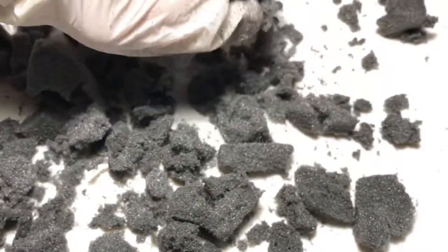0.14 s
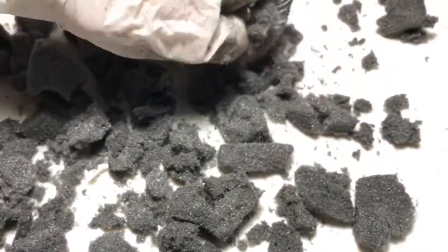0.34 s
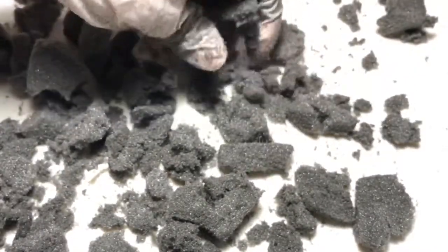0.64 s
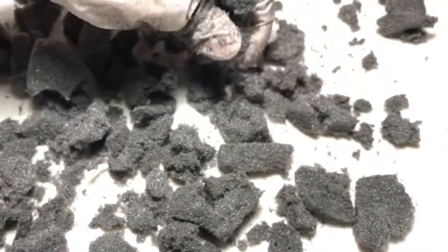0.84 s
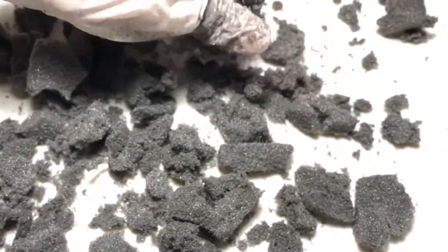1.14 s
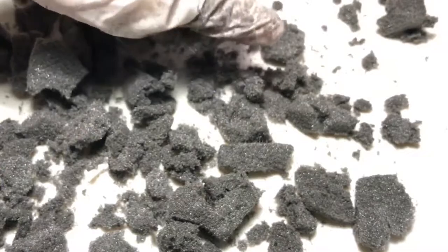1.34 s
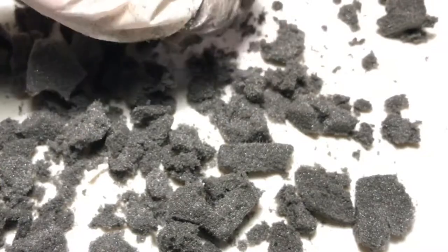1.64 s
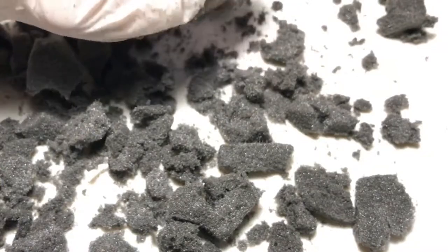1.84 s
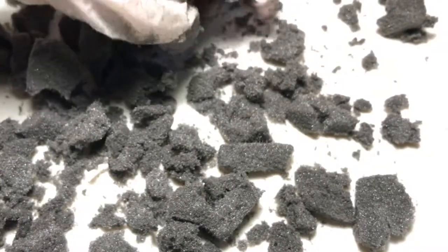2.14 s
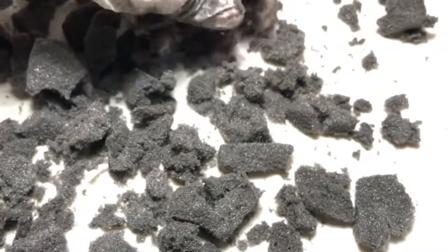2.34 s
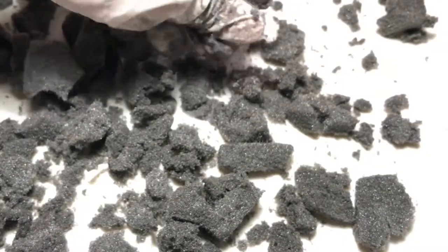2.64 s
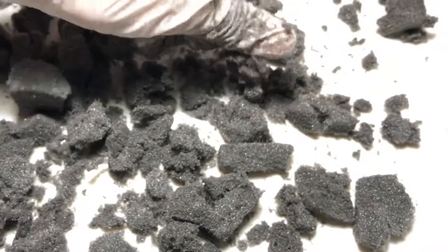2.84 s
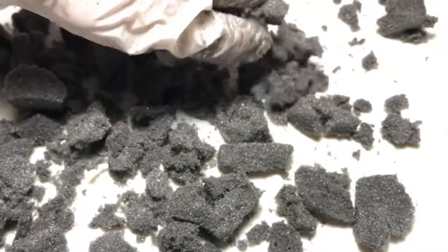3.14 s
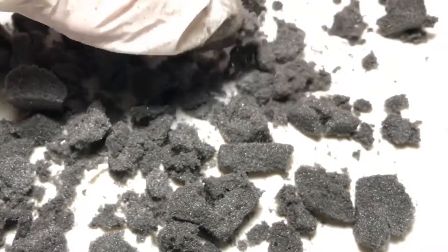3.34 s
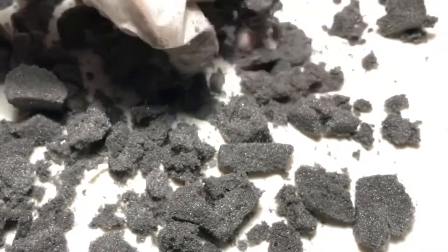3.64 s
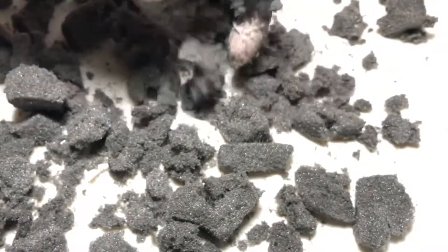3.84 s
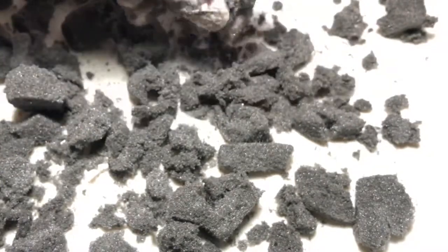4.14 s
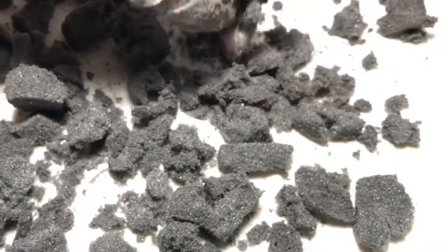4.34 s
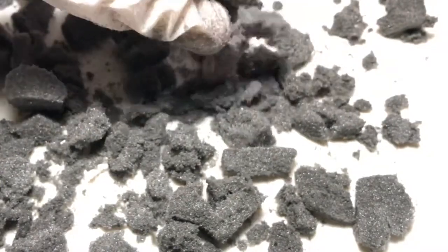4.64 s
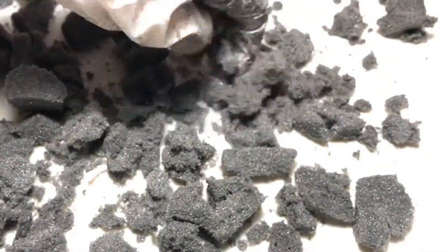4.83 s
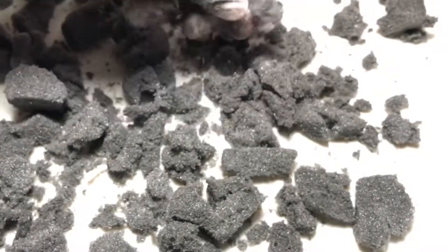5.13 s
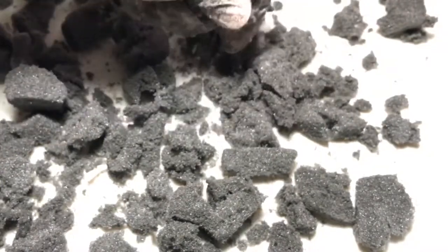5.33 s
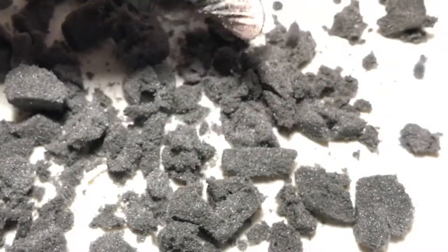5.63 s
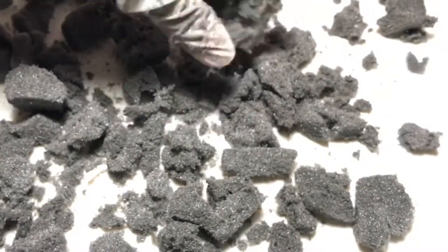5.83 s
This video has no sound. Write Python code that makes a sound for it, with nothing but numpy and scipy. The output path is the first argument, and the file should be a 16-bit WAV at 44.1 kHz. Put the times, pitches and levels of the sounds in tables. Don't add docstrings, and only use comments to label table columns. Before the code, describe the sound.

Dry foam breaks under a gloved hand in quick bursts of fine, fizzy crackle mixed with duller grinding and small lumps ticking on the table. The strongest breaks come in the first second or so; later presses are weaker with brief gaps, apart from one sharp crunch past the middle. Close, dry indoor sound, with faint glove rub and quiet motors droning behind.

```python
import sys
import numpy as np
from scipy import signal
from scipy.fft import rfft, irfft
from scipy.io import wavfile
from scipy.ndimage import uniform_filter1d, map_coordinates

SR = 44100
rng = np.random.default_rng(int(sys.argv[2]) if len(sys.argv) > 2 else 0)


def put_to_file(sound):
    columns = np.atleast_2d(sound).T
    safe = np.clip(columns, -1, 1)
    whole_steps = np.round(safe * 32767)
    wavfile.write(sys.argv[1], SR, whole_steps.astype(np.int16))


def volts_from_decibels(level):
    exponent = np.asarray(level, float) / 20
    return 10 ** exponent


N = 263718
TIME = np.arange(N) / SR
ONSET_S = 0.0011


def unit(x):
    return x / np.sqrt(np.mean(x ** 2))


def colour(x, points):
    hz, db = np.transpose(points)
    bins = np.maximum(np.fft.rfftfreq(len(x), 1 / SR), 1)
    gain = volts_from_decibels(np.interp(np.log(bins), np.log(hz), db))
    return irfft(rfft(x) * gain, len(x))


def walk(rate):
    hold = int(SR / rate)
    steps = np.repeat(rng.standard_normal(N // hold + 1), hold)
    return 0.87 * uniform_filter1d(uniform_filter1d(steps, hold), hold)[:N]


def fractures(rate, spread_db, tail_ms):
    chance, rarity = rng.random((2, N))
    power = (chance < rate / SR) * volts_from_decibels(-spread_db * np.log(1.008 - rarity)) ** 2
    keep = np.exp(-1000 / (tail_ms * SR))
    return np.sqrt(signal.lfilter([1], [1, -keep], power) + 1e-9)


def add(out, s, db, hz, width, tail_ms, noise):
    ms = np.arange(len(noise)) * 1000 / SR
    edges = np.clip([hz - width / 2, hz + width / 2], 300, 15500)
    front = np.exp(-ms / (0.3 * tail_ms))
    splinters = 0.25 * np.exp(-ms / tail_ms)
    burst = signal.lfilter(*signal.butter(2, edges, "band", fs=SR), noise * (front + splinters))
    i = int(s * SR)
    out[i:i + len(ms)] += (burst * volts_from_decibels(db) / np.abs(burst).max())[:N - i]


def air():
    # frequency in Hz, level in dB.
    room_colour = [(15, 3), (45, 6.5), (75, 0.5), (120, -5), (170, -1), (210, -1), (340, -6.5),
                   (500, -13.5), (820, -7.5), (1250, -15.5), (1700, -23.5), (3000, -24), (8000, -23),
                   (16000, -22)]
    # frequency in Hz, width in Hz, level in dB.
    duct_modes = [(346, 12.4, 1.5), (402, 15.6, 2.5), (551.2, 7.1, 0), (613, 14, -5), (706, 18, 0),
                  (809, 30, 0.5), (852, 21, 0), (1112, 14, -0.5), (1213, 40, -4)]
    noise = rng.standard_normal(N)
    duct = np.zeros(N)
    for hz, width, db in duct_modes:
        duct += volts_from_decibels(db) * signal.lfilter(*signal.iirpeak(hz, hz / width, SR), noise)
    room = unit(colour(rng.standard_normal(N), room_colour))
    return room * volts_from_decibels(-51.5 + 0.5 * walk(2.83)) + unit(duct) * volts_from_decibels(-58.5)


def hum():
    shaft_hz, pull_hz, beat_rad = 46.085, 100.08, -2.5
    # shaft order, order of the magnetic pull, level in dB rms.
    lines = [(1, 0, -54), (2, 0, -54), (3, 0, -45.7), (4, 0, -57), (5, 0, -66), (6, 0, -58), (8, 0, -78),
             (9, 0, -78), (12, 0, -78), (15, 0, -79), (0, 1, -64), (2, 1, -59), (3, 1, -67), (4, 1, -62),
             (6, 1, -79), (10, 1, -81), (15, 1, -75), (6, -1, -62), (7, -1, -71), (0, 2, -72), (7, 0, -79),
             (10, 0, -82), (8, 1, -80), (20, 0, -79), (0, 3, -78), (0, 4, -78)]
    # frequency in Hz, level in dB rms.
    motors = [(20.55, -67), (21.11, -68), (40.09, -60), (46.82, -58), (103.85, -70), (139.05, -75),
              (161.64, -70), (207.7, -77), (769.5, -80)]
    out = np.zeros(N)
    for hz, db in motors:
        out -= volts_from_decibels(db) * np.cos(2 * np.pi * hz * TIME)
    for shaft, mains, db in lines:
        start = -2.7 if shaft % 2 else -0.6 + mains * beat_rad
        hz = shaft * shaft_hz + mains * pull_hz
        out += volts_from_decibels(db) * np.cos(2 * np.pi * hz * TIME + start)
    return np.sqrt(2) * out


def squeaks():
    # centre in seconds, pitch in Hz, peak in dB, length in seconds.
    squeak_list = [
        (4.155, 1660, -57, .012),
        (4.28, 1700, -62, .01),
        (4.285, 2050, -61, .01),
        (3.03, 2550, -57, .012),
    ]
    waver = np.cumsum(walk(150)) * 120 / SR
    out = np.zeros(N)
    for s, hz, db, length in squeak_list:
        swell = np.exp(-((TIME - s) / length) ** 2)
        out += volts_from_decibels(db) * swell * np.sin(2 * np.pi * (hz * TIME + waver))
    return out


def lumps():
    # start in seconds, peak in dB, centre in Hz.
    lump_list = [(0.3222, -34, 2430), (0.3666, -47, 3980), (0.414, -41, 2620), (0.5007, -30, 4100),
                 (0.7302, -41.5, 4570), (0.805, -33, 2510), (0.8335, -37, 4310), (1.0675, -35, 4720),
                 (1.1563, -47, 4390), (1.821, -26, 4190), (2.0198, -37, 2450), (2.2306, -31.5, 4600),
                 (2.4149, -37, 4860), (2.4823, -31.5, 4300), (2.5356, -33, 4450), (2.605, -34, 4410),
                 (2.8654, -28.5, 4800), (3.2321, -29, 4560), (3.739, -33, 4260), (4.007, -37, 4800),
                 (4.139, -38.5, 4020), (4.2832, -39, 4150), (4.5206, -37, 4570), (4.5457, -20.5, 5100),
                 (4.598, -40, 4450), (4.6759, -38, 4600), (5.2749, -32, 4500), (5.4301, -30, 4410),
                 (5.5243, -34, 3190), (5.6171, -43, 2770)]
    out = np.zeros(N)
    for s, db, hz in lump_list:
        add(out, s + ONSET_S, db - 2, hz, 1800, 4, rng.standard_normal(500))
    return out


def tears():
    # start in seconds, centre in Hz, width in Hz, peak in dB, tail in ms.
    tear_list = [(.8635, 12700, 6000, -15, 5), (1.027, 12500, 6500, -13, 8.3),
                 (1.048, 12200, 5970, -12.5, 3.5), (2.545, 12700, 6000, -24, 3),
                 (3.02, 2620, 910, -46.5, 25), (3.244, 1500, 1600, -36.5, 35),
                 (3.2445, 4968, 1481, -31.5, 28), (6.3, 4800, 1800, -35, 11), (3.747, 10000, 9000, -36, 5),
                 (4.5405, 12530, 6200, -13, 14), (4.5448, 2770, 880, -28, 7.5),
                 (4.546, 14000, 6000, -12, 6.4), (4.5465, 5700, 1700, -24, 4.5),
                 (4.553, 13000, 5700, -28, 4.4), (4.6125, 11500, 7000, -30, 3), (5.03, 2900, 797, -46, 25),
                 (5.545, 3820, 2600, -33, 19), (5.884, 11000, 8000, -33.5, 4)]
    out = np.zeros(N)
    for s, hz, width, db, tail_ms in tear_list:
        add(out, s, db, hz, width, tail_ms, rng.standard_normal(900))
    return out


def snaps():
    # start in seconds, peak in dB, pitch in Hz (band centre is halfway to 12300).
    snap_list = [(0.5457, -22, 13300), (0.7741, -18, 14500), (0.8066, -7, 13700), (0.843, -12, 9540),
                 (0.856, -8, 14200), (0.8899, -10, 11000), (0.9981, -15, 11300), (1.0256, -9, 14200),
                 (1.044, -13, 11500), (1.1214, -16, 11600), (1.1573, -19, 14300), (1.3892, -24, 12200),
                 (2.2238, -25, 11900), (2.5334, -20, 14000), (3.034, -26, 13600), (3.1163, -22, 13600),
                 (3.2066, -19, 13600), (3.2715, -21, 9190), (3.4196, -31, 11400), (3.6566, -31, 12200),
                 (3.7025, -32, 11600), (3.9025, -29, 13800), (4.0078, -28, 13800), (4.4074, -23, 13800),
                 (4.4574, -19, 13700), (4.5296, -11, 11200), (4.5994, -22, 13000), (4.6768, -25, 14100),
                 (5.8172, -34, 14000), (5.883, -34, 11900)]
    out = np.zeros(N)
    for s, db, hz in snap_list:
        snap, underside, neighbours = rng.standard_normal((3, 900))
        underside_db = -20 - 0.29 * (db + 18)
        add(out, s + ONSET_S, db - 0.5, (hz + 12300) / 2, 5500, 2.2, snap)
        add(out, s + 2 * ONSET_S, db - 22, 11500, 7500, 16, neighbours)
        add(out, s + ONSET_S, db + underside_db - 1, 4200, 4000, 2.5, underside)
    return out


def crack():
    crack_s = 0.2850
    # frequency in Hz, peak in dB, swell in ms, sign of the first push.
    rings = [
        (9350, -4.5, .2, 1),
        (11450, -4.5, .19, -1),
        (7400, -21, .25, 1),
        (13000, -17, .17, 1),
        (5000, -28, .17, 1),
        (4000, -30, .17, -1),
        (2350, -24, .22, 1),
        (1700, -27, .22, -1),
        (980, -28, .29, 1),
        (14600, -24, .15, -1),
    ]
    ms = np.clip(TIME - crack_s, 0, 0.02) * 1000
    out = np.zeros(N)
    for hz, db, swell_ms, sign in rings:
        shape = (ms / swell_ms / 3) ** 3 * np.exp(3 - ms / swell_ms)
        out += sign * volts_from_decibels(db) * shape * np.cos(2 * np.pi * hz * (ms - 0.55) / 1000)
    first, splinters, dull = rng.standard_normal((3, 900))
    add(out, crack_s - 0.0004, -21, 10500, 6000, 1.5, first)
    add(out, crack_s + 0.0016, -18, 10600, 4500, 7, splinters)
    add(out, crack_s + 0.0018, -38, 2200, 1400, 10, dull)
    return out


def hand():
    grip_db_per_s, let_go_db_per_s, rest_db = 258, 263, -58.5
    # start in seconds, length in seconds, crackle at the start in dB,
    # swell over the press in dB, dullness in dB.
    presses = [(0, 0.12, -48, -1, 3.5), (0.296, 0.18, -44, -14.5, 1.5), (0.51, 0.29, -47, 8.5, 0.5),
               (0.846, 0.38, -28.5, -14.5, -2), (1.361, 0.35, -44, -11, 0), (1.681, 0.17, -37.5, -1, 1.5),
               (1.992, 0.038, -44, 1.5, -3), (2.221, 0.53, -45, 5, -1), (2.85, 0.014, -36.5, -2, 1.5),
               (2.903, 0.22, -48.5, 4.5, -1.5), (3.187, 0.051, -39.5, 8.5, -2.5),
               (3.344, 0.19, -56.5, 4, -0.5), (3.71, 0.068, -55.5, 2, 4), (3.9, 0.047, -53, 5.8, -3),
               (4.135, 0.23, -48.5, 2.5, -2), (4.401, 0.14, -42.5, 9.5, -2.5), (4.576, 0.043, -39, -6.5, 2),
               (4.711, 0.086, -49.5, 2.5, 2), (4.846, 0.12, -52.5, 0.3, 2.5),
               (5.01, 0.059, -44.5, 1.5, 1.5), (5.16, 0.31, -41, 1, -0.5), (5.477, 0.071, -48.5, 12, 0),
               (5.6, .18, -49, -8, -0.5), (5.975, .03, -53.5, 5, 3)]
    s, length, db, swell_db, dull_db = np.transpose(presses)[:, :, None]
    since = TIME - s
    swell = swell_db * np.clip(since / length, 0, 1)
    grip = grip_db_per_s * np.minimum(since, 0)
    let_go = let_go_db_per_s * np.maximum(since - length, 0)
    power = volts_from_decibels(db + swell + grip - let_go) ** 2
    total = power.sum(axis=0) + volts_from_decibels(rest_db) ** 2
    return 10 * np.log10(total), (power * dull_db).sum(axis=0) / total


def glove_rub(grind, harder_db):
    # time in seconds, pitch of the cupped hollow in Hz, drag on the foam in dB.
    glove = [(0, 2766, -8.5), (.32, 2720, 2.5), (.68, 2590, 0.5), (.87, 2630, 2), (1.199, 2780, -3.5),
             (1.5, 2720, 1.5), (1.8, 2590, 2.5), (2.1, 2690, 3.5), (2.5, 2820, 2), (2.8, 2760, -3),
             (3.03, 2590, 2), (3.15, 2570, -8.5), (3.399, 2640, 4.5), (4.1, 2950, -0.5), (4.42, 2750, -8),
             (5.051, 2960, 2.5), (5.56, 2990, -2), (5.98, 3010, 3.5)]
    # frequency in Hz, level in dB per Hz.
    rub_colour = [(500, -44), (900, -6), (1500, -13), (2000, -10), (3400, -2), (4200, -70), (8000, -55)]
    s, pitch_hz, drag = np.transpose(glove)
    hollow_hz = np.interp(TIME, s, pitch_hz)
    drag_db = np.interp(TIME, s, drag)
    rub_db = -16 + drag_db - 0.17 * harder_db + 1.06 * walk(12)
    slow = grind * rng.standard_normal((2, N))
    slow = uniform_filter1d(uniform_filter1d(slow, size=56), size=56)
    turn = 2 * np.pi * np.cumsum(hollow_hz) / SR
    ring = unit(slow[0] * np.cos(turn) + slow[1] * np.sin(turn))
    cupped = np.clip((hollow_hz - 2600) / 380, 0.15, 1.1)
    drag_noise = unit(colour(grind * rng.standard_normal(N), rub_colour))
    return (cupped * ring + drag_noise) * volts_from_decibels(rub_db + 1.7) / np.sqrt(1 + cupped ** 2)


def foam():
    # frequency in Hz, dB per Hz.
    crackle_colour = [(1500, -51), (4000, -25), (6000, -15), (7000, -10.5), (8200, -8), (9500, -2),
                      (10300, -3), (11300, 0.5), (12500, -4.5), (13300, -11), (16000, -52)]
    sheen_colour = [(10000, -40), (11800, -13), (12600, -4), (13300, -4), (14000, -1), (15000, -5),
                    (16500, -5)]
    crunch_colour = [(2500, -51), (3600, -8), (4400, 0.5), (5200, -3), (6000, -10), (7000, 1), (10000, -77)]
    crackle_db, dull_db = hand()
    harder_db = crackle_db + 45
    sheen_db = 0.5 - 0.4 * dull_db + 0.54 * walk(2.8)
    crunch_db = -10.5 + dull_db - 0.17 * harder_db + 1.6 * walk(8.2)
    ticks = 2.5 * fractures(200, 3.0, 0.35)
    swarm = fractures(2200, 3.3, 2.7) * volts_from_decibels(0.75 * walk(45))
    cells = np.hypot(swarm, ticks)
    grind = cells ** 1.05 * fractures(500, 2.07, 6.6) ** 0.74
    crackle = unit(colour(cells * rng.standard_normal(N), crackle_colour)) * volts_from_decibels(0.88 + walk(26))
    sheen = unit(colour(cells * rng.standard_normal(N), sheen_colour)) * volts_from_decibels(sheen_db + 1.5 + walk(30))
    crunch = unit(colour(grind * rng.standard_normal(N), crunch_colour)) * volts_from_decibels(crunch_db + 1.54)
    return volts_from_decibels(crackle_db) * (crackle + sheen + crunch + glove_rub(grind, harder_db))


def tabletop(x):
    echo_ms, drift_ms, gain = 0.428, 0.035, 0.24
    lag = (echo_ms + drift_ms * walk(4.07)) * SR / 1000
    echo = map_coordinates(x, [np.arange(N) - lag], order=3)
    return (x + gain * echo) / np.sqrt(1 + gain ** 2)


def scene():
    background = air() + hum()
    on_table = squeaks() + lumps() + tears() + snaps() + foam()
    return (background + crack() + tabletop(on_table))[None]


def band_limit(x):
    return signal.sosfilt(signal.butter(12, 16400, fs=SR, output="sos"), x)


def record(dry):
    top_cut = signal.ellip(12, 0.3, 60, 15740, fs=SR, output="sos")
    mix = np.clip(signal.sosfilt(top_cut, dry), -1, 1)
    return band_limit(mix)


dry = scene()
out = record(dry)
put_to_file(out)
```